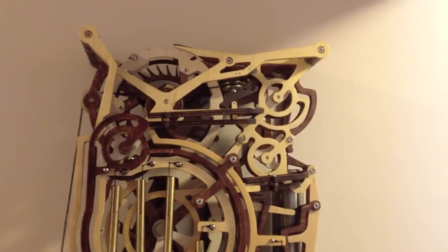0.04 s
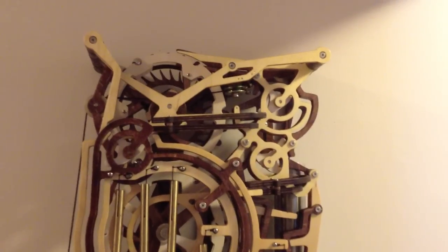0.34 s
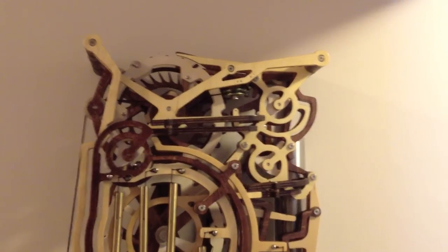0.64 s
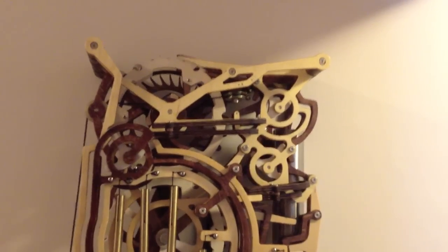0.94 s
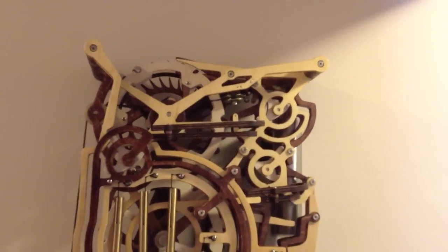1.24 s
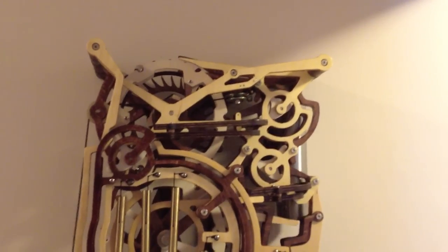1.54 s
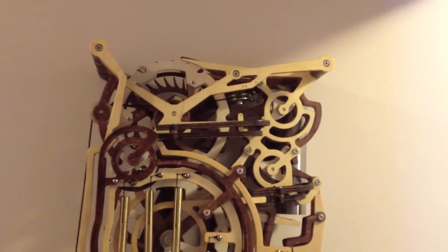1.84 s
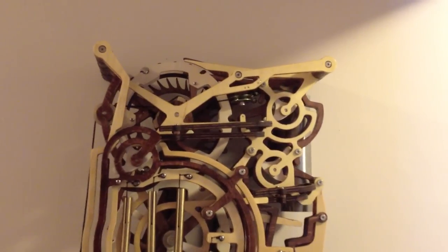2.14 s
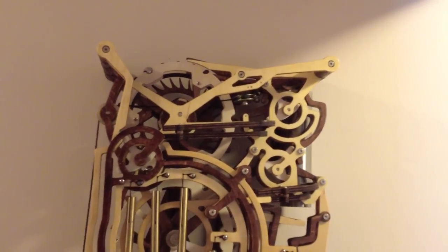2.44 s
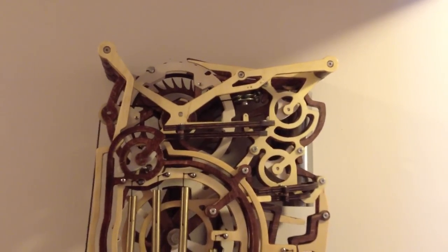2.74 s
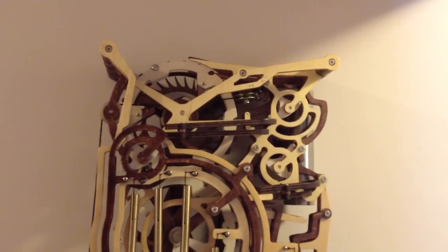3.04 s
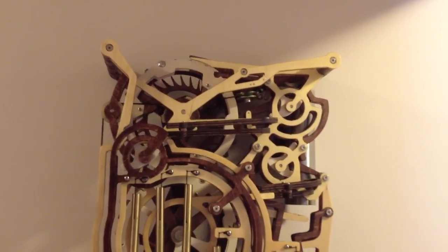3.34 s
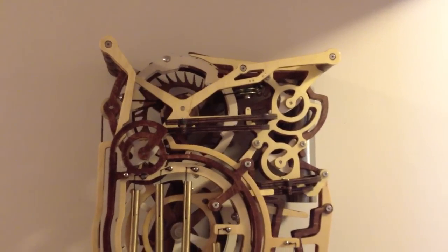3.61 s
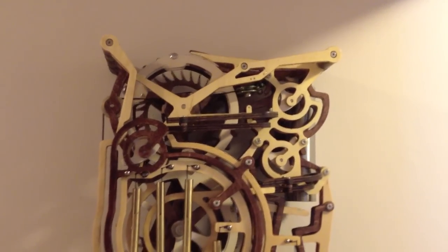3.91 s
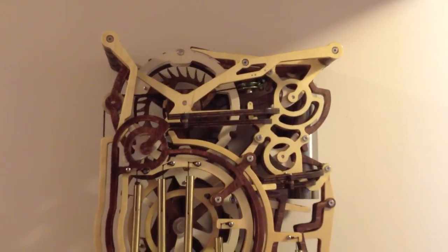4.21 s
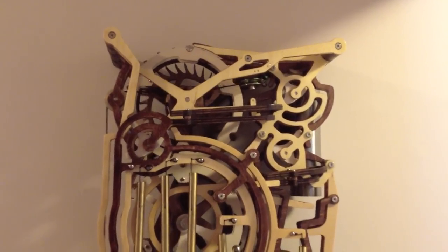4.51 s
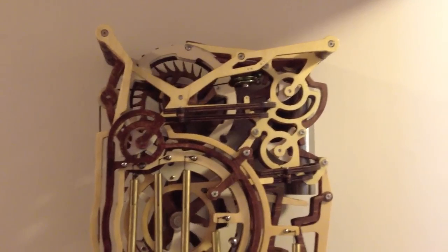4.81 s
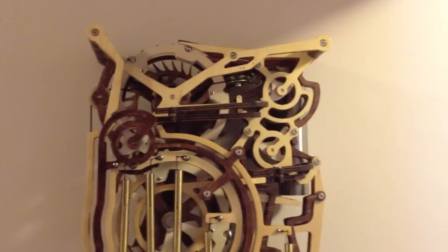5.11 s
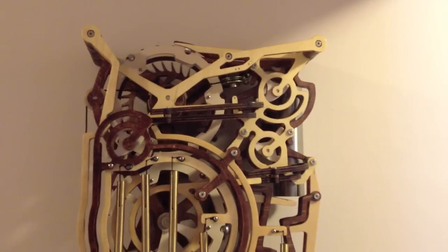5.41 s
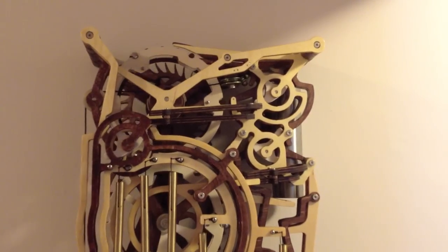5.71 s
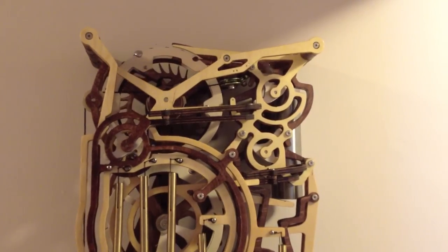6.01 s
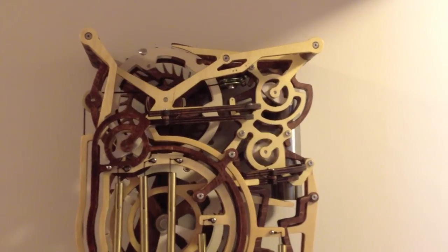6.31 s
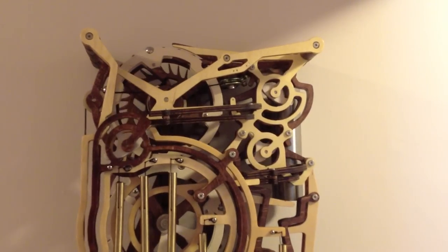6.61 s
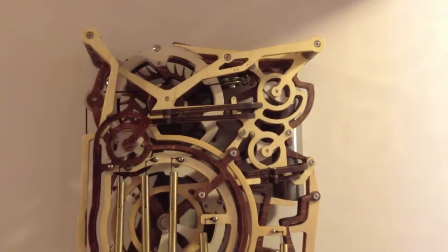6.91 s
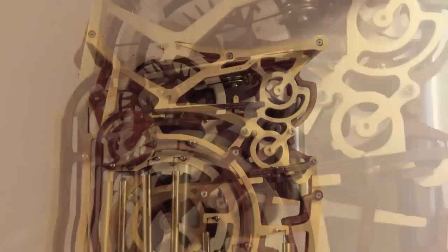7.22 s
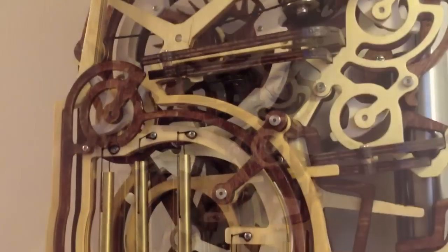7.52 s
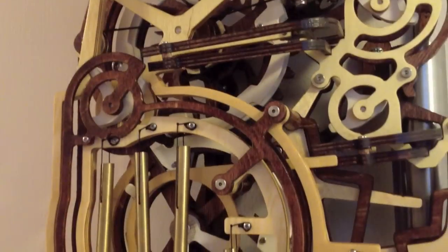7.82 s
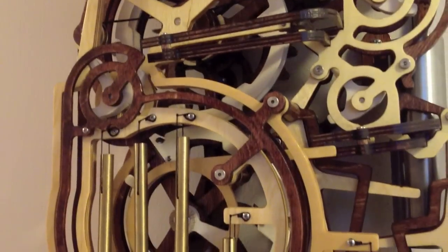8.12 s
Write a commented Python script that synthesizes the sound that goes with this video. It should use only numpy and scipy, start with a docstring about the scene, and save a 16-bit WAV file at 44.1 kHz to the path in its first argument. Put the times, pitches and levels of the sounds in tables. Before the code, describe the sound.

Irregular clacks of steel marbles and wooden parts open the sound of a running marble machine. Small catches tick softly, and the wooden gears settle into short, repeated rattles. Later the marbles clatter again, brighter and closer together, with a faint roll underneath, before fading to scattered ticks. The frame rings slightly with each knock, in a small room with a low, steady hush.

```python
"""A wooden marble machine runs on a wall of a small, quiet room. Steel marbles click against each other and
their rails. Wooden gears and levers lurch on about three times a second, each lurch a short rattle of weakening
contacts. Small catches tick in between, and marbles and axles rumble over the grain. The frame rings with every
blow, a struck metal tube sings faintly near the end, and the room adds short reflections and a steady hush."""
import sys
import numpy as np
from scipy import signal
from scipy.io import wavfile

SR = 44100
rng = np.random.default_rng(int(sys.argv[2]) if len(sys.argv) > 2 else 0)


def dump_mix(stems):
    """Bounce the given channels to the path in sys.argv[1] as a 16-bit WAV at rate SR."""
    frames = np.atleast_2d(stems).T  # one column per channel
    limited = np.clip(frames, -1, 1)  # hard clip at full scale
    pcm = np.round(limited * 32767).astype(np.int16)
    wavfile.write(sys.argv[1], SR, pcm)


N = 359415

# lurches of the works: start_s, length_s, level_db, thud_weight_db
LURCHES = [(.372, 0.085, -43.5, 0.5), (0.486, .06, -43.5, 4.5), (0.621, 0.023, -38, 0.5),
           (0.818, 0.046, -40, -2.5), (1.18, 0.016, -35.5, -6), (1.295, 0.024, -39.5, -0.5),
           (1.507, 0.018, -39.5, -0.5), (1.632, 0.032, -42.5, 3), (2.277, 0.027, -44.5, -1),
           (2.309, 0.03, -42.5, -1), (3.203, 0.077, -49, -2), (3.444, 0.071, -43.5, -2),
           (3.736, 0.063, -41.5, -4.5), (4.014, 0.056, -44.5, 0), (4.322, 0.056, -41, -3),
           (4.585, 0.052, -41.5, -1.5), (4.902, 0.039, -40.5, -1.5), (5.187, 0.038, -40.5, -4),
           (5.509, 0.051, -42.5, -1.5), (5.805, 0.05, -42.5, -3), (6.057, 0.19, -44, -5.5),
           (6.315, .026, -41.5, -18), (6.369, 0.023, -37.5, -9.5), (6.45, 0.073, -43.5, -3),
           (6.534, 0.066, -40.5, -8), (6.782, 0.049, -41.5, -3), (6.869, .04, -43, 0),
           (7.033, 0.031, -41, -8), (7.072, 0.024, -40.5, -2), (7.203, .027, -46.5, -7),
           (7.253, 0.0092, -36, -8), (7.351, .11, -45.5, -3.5), (7.599, 0.094, -53, 1.5),
           (7.929, 0.097, -49.5, 2.5)]
# modes of struck wood: pitch_hz, width_hz, gain_db
CLACK_MODES = [(597, 610, -11.5), (1240, 980, -6.5), (2930, 890, -4.5), (3514, 360, -5.5), (4360, 680, -8)]
# treble modes of a hard contact: pitch_hz, width_hz, gain_db
CRACK_MODES = [(11400, 2400, 4.5), (12540, 2700, 2.5), (14300, 1400, -8.5)]
CLACK_DB = -3.5


def marble_clicks(rail_db=-0.2, crack_db=-1.0, fade_s=0.0038, energy_s=0.0066):
    """Each strike wakes wood and rail; the harder it lands, the more it cracks and damps the rail."""
    # start_s, level_db, hardness_db
    strikes = [(.3532, -30.5, -8.5), (.425, -24.5, -11.5), (0.484, -29, -10.5), (0.5851, -31.5, -4),
               (.609, -32.5, -8), (.6797, -34.5, -8), (0.812, -39, -5), (1.0196, -48, -20),
               (1.1778, -29.5, -10), (1.276, -31, -8.5), (1.4894, -30, -13), (1.6094, -33.5, -22),
               (1.634, -36, -4.5), (2.322, -39.5, -8), (4.5884, -39, -2.5), (5.315, -53, -4),
               (5.964, -49, 0), (6.0544, -29, -1.5), (6.068, -36, 3.5), (6.087, -32, -9), (6.118, -24, 3.5),
               (6.175, -35, -10), (6.2236, -37, -4), (6.3153, -32.5, 7.5), (6.3214, -34, 0),
               (6.3526, -32, -0.5), (6.3735, -35, -3), (6.4189, -30.5, -5), (6.532, -28, -2),
               (6.5864, -32.5, -5), (6.6843, -42.5, -3.5), (6.869, -30.5, 2.5), (6.9734, -42, 0.5),
               (7.0305, -39, -4), (7.0706, -33, 3), (7.253, -38.5, -2), (7.4119, -53, 11),
               (7.4319, -38.5, -1.5), (7.4967, -47.5, 5), (7.628, -51, 0), (7.672, -51.5, 0),
               (7.959, -46, -1), (8.0578, -54.5, -5)]
    # pitch_hz, width_hz, gain_db
    rail_modes = [(5610, 510, 3.5), (6750, 430, 1), (8140, 290, -8.5)]
    out = np.zeros(N)
    for start_s, level_db, hardness_db in strikes:
        damping = 1 + 2 * min(amp(hardness_db), 1)
        damped_rail = [(hz, width_hz * damping, db / damping) for hz, width_hz, db in rail_modes]
        parts = (CLACK_MODES, CLACK_DB), (damped_rail, rail_db), (CRACK_MODES, hardness_db + crack_db)
        for modes, gain_db in parts:
            click = np.convolve(chatter(fade_s), ring(modes))
            add(out, start_s, leveled(click, level_db + gain_db, energy_s))
    # parts this small radiate almost no bass
    return signal.sosfilt(signal.butter(2, 250, "highpass", fs=SR, output="sos"), out)


def wooden_works(contacts_per_s=800, uneven_db=2.0, sag_db=3, release_s=0.0087,
                 slack_s=0.014, slack_db=-22, thud_db=-3, plank_db=-1.5, scrape_db=-4):
    """Slack is taken up softly, then a run of weakening contacts goes through the wooden parts."""
    # spectra of heavy parts, planks and scraping faces: freq_hz, gain_db
    thud = [(30, -44.5), (60, -25.5), (85, -18), (118, -13), (145, -2.5), (200, -4), (280, 3.5),
            (380, -4.5), (550, -21.5), (1500, -71.5)]
    plank = [(100, -52.5), (300, -9), (480, -3.5), (620, 1.5), (900, -1.5), (1250, 0.5), (1600, -4.5),
             (2100, -9), (2700, -12.5), (4000, -23.5), (9000, -56)]
    scrape = [(500, -37.5), (2000, -9.5), (3300, 7.5), (4600, 2.5), (5700, 3), (7200, 0), (8400, 0),
              (9500, -7.5), (11300, -4.5), (13500, -6.5), (15300, -20.5)]
    out = np.zeros(N)
    for start_s, length_s, level_db, weight_db in LURCHES:
        t = np.arange(round((slack_s + length_s + 5 * release_s) * SR)) / SR - slack_s
        moving_s = np.maximum(t, 0)
        push = np.exp(-np.maximum(t - length_s, 0) / release_s) * amp(-sag_db * moving_s / length_s)
        push *= np.clip(t / 0.0022, amp(slack_db), 1)
        contacts = rng.random(len(t)) < contacts_per_s / SR
        knocks = contacts * amp(uneven_db * rng.standard_normal(len(t))) * rng.choice([-1, 1], len(t))
        rubbing = 0.19 * rng.standard_normal(len(t))
        soft = push * (knocks + rubbing)
        sharp = push * (knocks * abs(knocks) + rubbing)  # harder contacts are brighter
        heavy = soft * (1 - np.exp(-moving_s / 0.0099))  # heavy parts take a moment to move
        parts = (heavy, thud, weight_db + thud_db), (soft, plank, plank_db), (sharp, scrape, scrape_db)
        for drive, spectrum, gain_db in parts:
            rattle = signal.fftconvolve(drive, response(varied(spectrum)))
            add(out, start_s - slack_s, leveled(rattle, level_db + gain_db, length_s + release_s))
    return out


def catch_ticks(catch_db=-10, crack_db=-29, fade_s=0.0026, energy_s=0.0028):
    """A light catch drops onto its wheel with a small woody ring."""
    # start_s, level_db
    drops = [(0.0556, -43.5), (1.7824, -36.5), (2.049, -44), (2.2384, -47.5), (2.5194, -46),
             (2.6598, -45.5), (2.783, -49), (2.8598, -43.5), (2.9386, -51.5), (3.175, -50), (3.282, -39),
             (3.578, -42), (3.71, -38), (5.1494, -43), (5.639, -40.5), (5.95, -35.5)]
    # pitch_hz, width_hz, gain_db
    catch_modes = [(1750, 250, -5), (2400, 110, -2.5), (3030, 75, -3), (3550, 980, -1), (4440, 500, -3.5),
                   (5900, 740, 1), (7900, 530, -6.5)]
    parts = (catch_modes, catch_db), (CRACK_MODES, crack_db), (CLACK_MODES, catch_db + CLACK_DB)
    out = np.zeros(N)
    for start_s, level_db in drops:
        for modes, gain_db in parts:
            tick = np.convolve(chatter(fade_s), ring(modes, spread=0, samples=2000))
            add(out, start_s, leveled(tick, level_db + gain_db, energy_s))
    return out


def rolling(gain_db=-3.0, bumps_per_s=350, coast_db=-20):
    """Marbles run over the grain of the wood; axles coast on after each lurch."""
    # marble runs: start_s, length_s, level_db
    runs = [(.33, 0.4, -50), (1.136, 0.49, -53), (5.787, 0.14, -53.5), (6.305, 0.33, -48), (6.75, .85, -55)]
    # freq_hz, gain_db
    track_spectrum = [(40, -44.5), (90, -17.5), (160, -4.5), (300, 4), (500, -5), (1200, -10),
                      (2200, -12.5), (3500, -16.5), (7000, -17.5), (9500, -26.5), (12000, -24),
                      (15500, -23)]
    run_power = sum(swell(*run, fade_db_per_s=65) ** 2 for run in runs)
    coast_power = sum(swell(start_s, length_s, level_db + coast_db, fade_db_per_s=29.5) ** 2
                      for start_s, length_s, level_db, _ in LURCHES)
    bumps = (rng.random(N) < bumps_per_s / SR) * rng.standard_normal(N)
    grain = bumps + 0.1 * rng.standard_normal(N)
    rumble = signal.oaconvolve(grain, response(track_spectrum))[:N]
    return leveled(rumble, gain_db, N / SR) * np.sqrt(run_power + coast_power)


def frame_ring(blows):
    """The frame and its metal tubes ring in sympathy with every blow."""
    # pitch_hz, t60_s, gain_db
    frame_modes = [(148.8, .75, 6), (242, 0.36, -7.5), (292.3, .5, 8), (368, 0.83, -2.5), (428, 0.39, 8.5),
                   (835, 0.37, -9.5), (955, .3, -6), (1235, .22, -2.5), (2490, 0.25, -2), (3550, .45, -4),
                   (5611, .22, -7), (10928, 0.18, -12)]
    out = np.zeros(N)
    for pitch_hz, t60_s, gain_db in frame_modes:
        radius = np.exp(-np.log(1000) / (t60_s * SR))
        pole = radius * np.exp(2j * np.pi * pitch_hz / SR)
        out += amp(gain_db) * 2 * signal.lfilter([1 - radius], [1, -pole], blows).real
    return out


def struck_tube(start_s=7.432, level_db=-73):
    """A metal tube, struck once, sings on faintly."""
    # pitch_hz, width_hz, gain_db
    tube_modes = [(2300, 0.49, 2), (3219, 1, -8)]
    out = np.zeros(N)
    add(out, start_s, leveled(ring(tube_modes, spread=0, samples=SR), level_db, energy_s=0.59))
    return out


def room_tail(early_db=4, early_fade_s=0.0098, gap_s=0.0021, taps_per_s=5000):
    """Dense reflections, strongest off the near wall, each band dying at its own rate."""
    # freq_hz, t60_s
    decay_times = [(100, 0.65), (300, 0.36), (1000, 0.45), (3000, 0.37), (6000, 0.28), (10000, 0.28),
                   (15000, 0.24)]
    t = np.arange(SR) / SR
    taps = rng.standard_normal(SR) * (rng.random(SR) < taps_per_s / SR) * (t > gap_s)
    taps *= amp(early_db * np.exp(-t / early_fade_s))
    freq_hz, time_s, bands = signal.stft(taps, SR, nperseg=256)
    decay = amp(-60 * time_s / lookup(decay_times, freq_hz)[:, None])
    tail = signal.istft(bands * decay, SR, nperseg=256)[1]
    return tail / np.linalg.norm(tail)


def room_echo(x, spots=5, spots_per_s=55):
    """Successive contacts come from different spots on the machine, each with its own reflections."""
    position = spots_per_s * np.arange(N) / SR
    out = np.zeros(N)
    for spot in range(spots):
        distance = np.minimum(abs((position - spot) % spots - spots / 2), 1)
        out += signal.fftconvolve(x * np.cos(np.pi / 2 * distance), room_tail())[:N]
    return out


def room_hush(level_db=-65.5):
    """The steady air of the room."""
    # freq_hz, gain_db
    air_spectrum = [(15, -67), (25, -37), (122, -2), (289, 2), (482, -8), (582, -6.5), (2700, -20.5),
                    (3090, -17.5), (9300, -26.5), (14300, -22), (15500, -32)]
    air = signal.oaconvolve(rng.standard_normal(N), response(air_spectrum))[:N]
    return leveled(air, level_db, N / SR)


def chatter(fade_s, rise_s=0.00056, shiver_s=0.011, samples=1300):
    """Force of a hard contact: tiny rebounds, then a weak shiver of the parts nearby."""
    t = np.arange(samples) / SR
    decay = np.exp(-(t / fade_s) ** 2) + 0.54 * np.exp(-t / shiver_s)
    envelope = (1 - np.exp(-t / rise_s)) * decay
    return envelope * rng.standard_normal(samples) * rng.exponential(1, samples) ** 0.32


def ring(modes, spread=0.032, samples=700):
    """Damped modes; spread detunes them for each point of contact."""
    t = np.arange(samples) / SR
    out = np.zeros(samples)
    for pitch_hz, width_hz, gain_db in modes:
        detuned_hz = pitch_hz * (1 + spread * rng.uniform(-0.51, 1))
        envelope = amp(gain_db) * np.sqrt(width_hz) * np.exp(-np.pi * width_hz * t)
        out += envelope * np.sin(2 * np.pi * (detuned_hz * t + rng.random()))
    return out * (1 - np.exp(-t * SR / 10))


def swell(start_s, length_s, level_db, fade_db_per_s, rise_db_per_s=168.5):
    """A gain that rises, holds and fades."""
    t = np.arange(N) / SR - start_s
    rise_db = rise_db_per_s * np.minimum(t, 0)
    return amp(level_db + rise_db - fade_db_per_s * np.maximum(t - length_s, 0))


def varied(spectrum, spread_db=1.5):
    """Each wooden part has its own colour."""
    freq_hz, gain_db = np.transpose(spectrum)
    return np.column_stack([freq_hz, gain_db + spread_db * rng.standard_normal(len(freq_hz))])


def response(spectrum, fft_size=4096):
    """Minimum-phase impulse response of a spectrum."""
    freq_hz = abs(np.fft.fftfreq(fft_size, 1 / SR))
    log_gain = np.log(amp(lookup(spectrum, freq_hz)))
    return np.fft.ifft(np.exp(np.conj(signal.hilbert(log_gain)))).real[:fft_size // 2]


def lookup(table, freq_hz):
    """Interpolates on a log-frequency axis."""
    knots_hz, values = np.transpose(table)
    return np.interp(np.log(freq_hz + 1), np.log(knots_hz + 1), values)


def leveled(x, level_db, energy_s):
    """Gives x the energy of level_db held for energy_s."""
    return x * amp(level_db) * np.sqrt(energy_s * SR / (np.sum(x ** 2) + 1e-20))


def add(mix, start_s, sound):
    """Adds a sound in place."""
    part = mix[max(round(start_s * SR), 0):][:len(sound)]
    part += sound[:len(part)]


def amp(db):
    """Decibels to gain."""
    return 10 ** (np.asarray(db) / 20)


def scene(frame_db=-3, room_db=-2):
    """The machine, its ringing frame and the room, in mono."""
    machine = marble_clicks() + catch_ticks() + wooden_works() + rolling()
    ringing = amp(frame_db) * frame_ring(machine) + struck_tube()
    echo = amp(room_db) * room_echo(machine)
    return (machine + ringing + echo + room_hush())[None]


def record(dry, low_cut_hz=42, high_cut_hz=15450):
    """Gentle low cut, steep high cut."""
    thinned = signal.sosfilt(signal.butter(2, low_cut_hz, "highpass", fs=SR, output="sos"), dry)
    lowpass = signal.firwin(255, high_cut_hz, window=("kaiser", 8), fs=SR)
    return signal.oaconvolve(thinned, lowpass[None], "same")


dry = scene()
out = record(dry)
dump_mix(out)
```